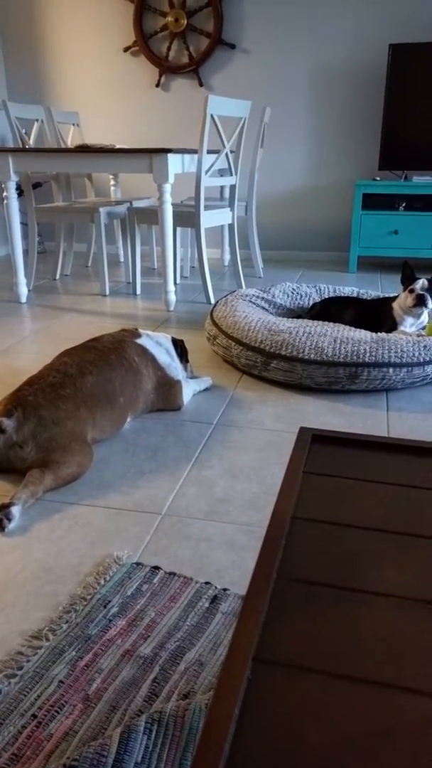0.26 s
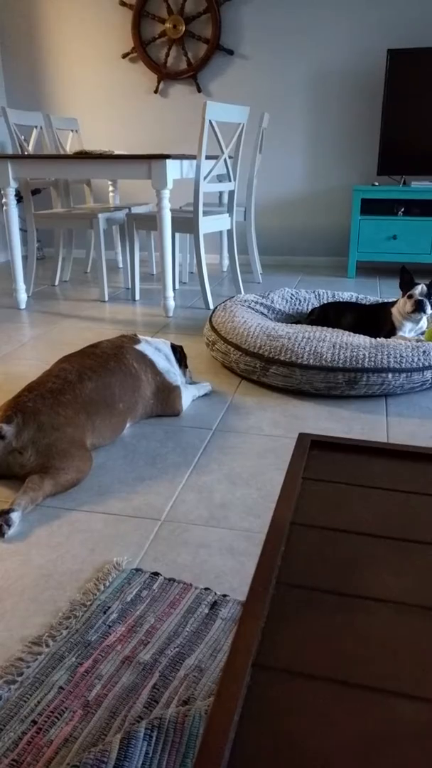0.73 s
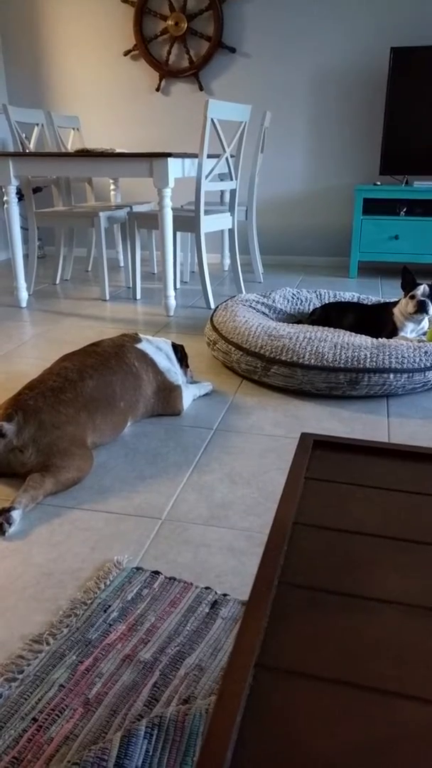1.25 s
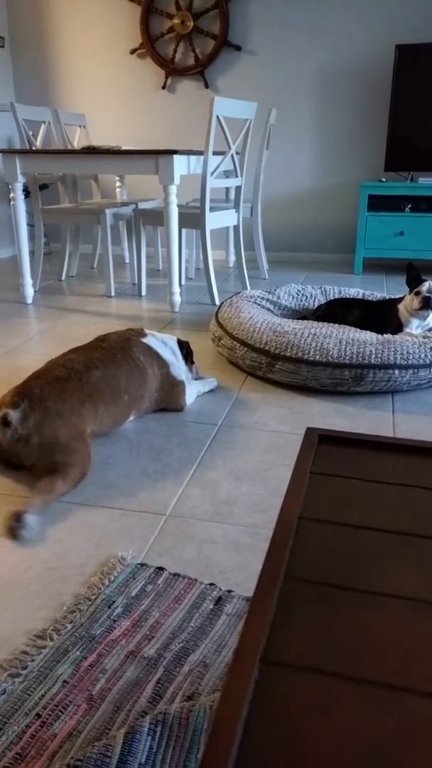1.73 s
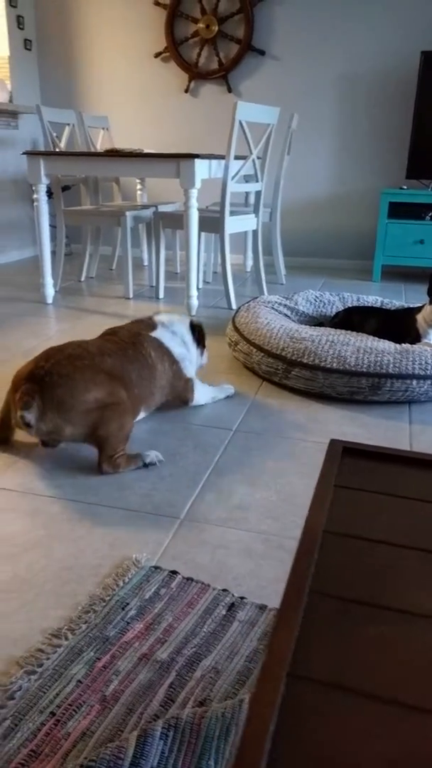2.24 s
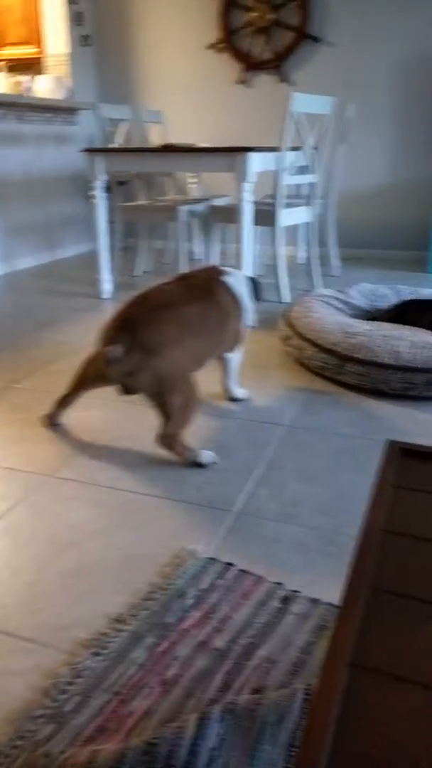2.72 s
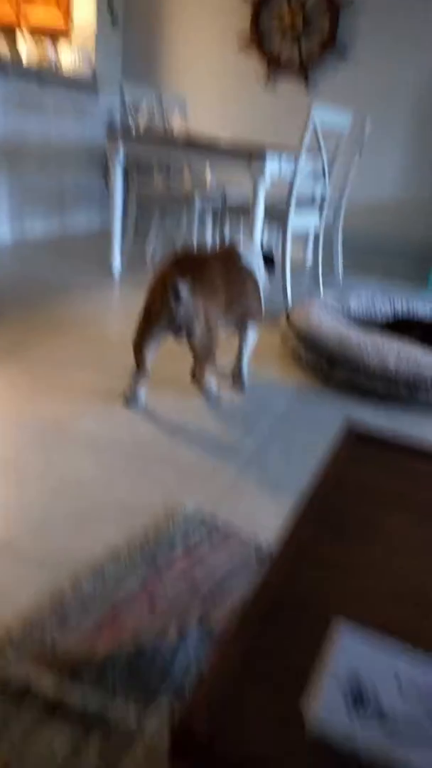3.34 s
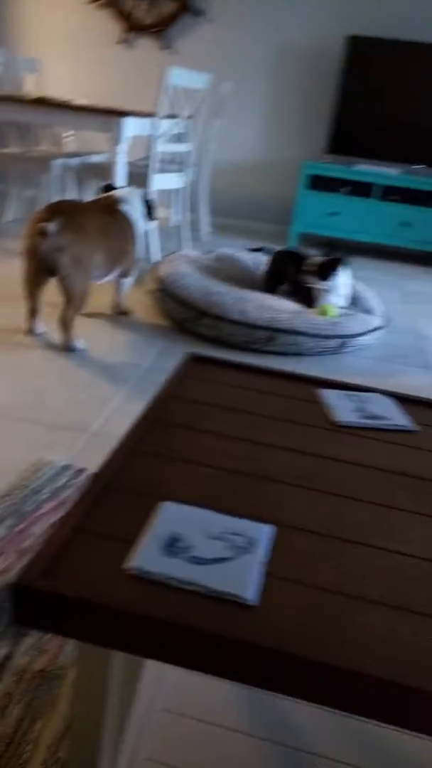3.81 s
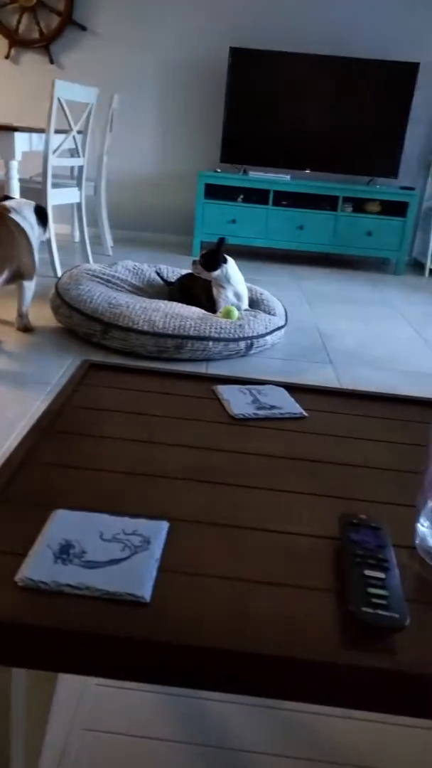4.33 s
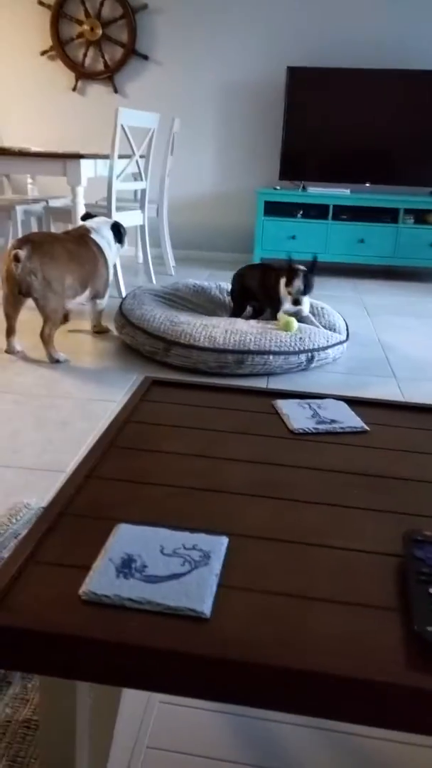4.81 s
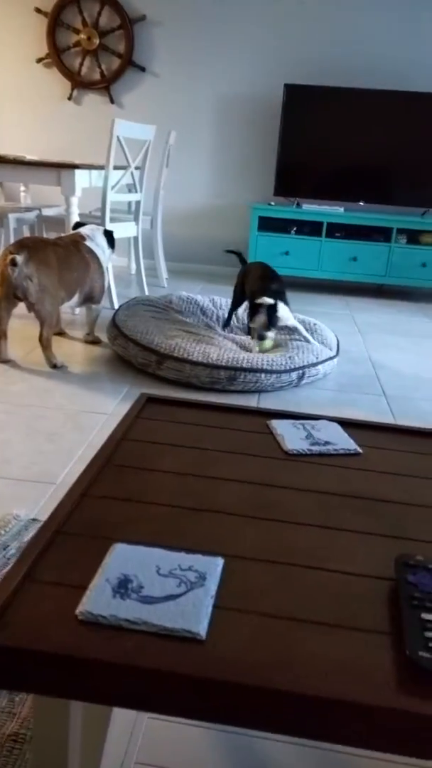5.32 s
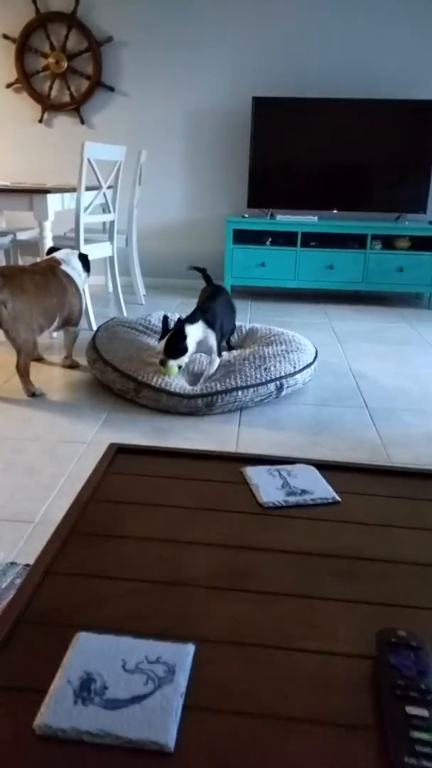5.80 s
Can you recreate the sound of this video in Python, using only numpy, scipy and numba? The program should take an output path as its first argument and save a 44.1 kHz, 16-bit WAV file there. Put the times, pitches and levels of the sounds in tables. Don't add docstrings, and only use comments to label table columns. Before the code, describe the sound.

A phone microphone in a quiet tiled living room hears low room tone, soft hiss and faint fridge hum. A small claw tick comes at 0.4 s. At 0.6-0.72 s a strap rasps very close: a loud, dry, zip-like buzz that speeds up and ends in two tiny snaps. Light claw and paw steps follow around 1.2 s. From about 1.5 to 2.4 s a bulldog a few metres away grumbles low and throaty, mouth closed, as fur or cloth rustles. Paws skid and claws tick at 2.5-3.1 s, with dull hand thumps on the phone near 2.8 s. At 3.55 s a loud, abrupt bark leaps up in pitch and turns hoarse, fading by 4 s into hard room echo. A rough growl rises from 4.25 s into a second tight, beating bark at 4.65-5.05 s. Reverberation, soft scuffs and faint whistling nose breaths close it.

```python
import sys
import numpy as np
from scipy import signal
from scipy.fft import rfft, irfft
from scipy.io import wavfile
from scipy.ndimage import uniform_filter1d, minimum_filter1d
from numba import njit

SR = 44100
rng = np.random.default_rng(int(sys.argv[2]) if len(sys.argv) > 2 else 0)


def elevation(decibels):
    levels = np.asarray(decibels, float)
    return 10 ** (levels / 20)


def persist_wave(psi):
    counts = np.round(np.clip(psi, -1, 1) * 32767).astype(np.int16)
    wavfile.write(sys.argv[1], SR, np.atleast_2d(counts).T)


N = 267113
TIME = np.arange(N) / SR


# time_s, effort_db, fold_rate_hz, throat_hz, opening_db
BARK_PATHS = [
    [(3.549, -26, 215.1, 404, -21), (3.578, -18, 230.3, 454, -9.5), (3.588, -13, 547.5, 536, -1.5),
     (3.61, -7.5, 567, 550, -3.5), (3.64, -7.5, 593, 544, -15.5), (3.67, -14.5, 570.5, 578, 2),
     (3.76, -17, 546.4, 566, -5), (3.88, -19.5, 519.6, 563, 1.5), (4.03, -40, 520.7, 588.7, -12)],
    [(4.62, -33, 207.9, 240, -27), (4.651, -29, 250, 284, -19), (4.658, -23, 370, 380, -14),
     (4.671, -21, 388.7, 470, -9), (4.681, -11, 557, 597, -1), (4.735, -11, 551.5, 580, -4.5),
     (4.91, -18.5, 524.8, 570, -0.5), (5.04, -28, 520.3, 557, -3), (5.09, -46.5, 523, 535, -1)],
]
LOCK_TIMES = [3.605, 4.68]
# centre_hz, width_hz, level_db
MOUTH_MODES = [
    [(694, 140, 0.5), (929, 112, 4), (1027, 100, 1), (1390, 227, -5.5), (1736, 200, -7), (2067, 250, -28.5)],
    [(743, 56, -9), (842, 80, 3.5), (954, 76, 1.5), (1111, 98, -6.5), (1387, 167, -3), (1924, 180, -9.5)],
]
# centre_hz, width_hz, level_db
SNOUT_MODES = [
    [(2696, 220, 8.5), (3004, 310, -6.5), (3900, 250, -14)],
    [(2680, 330, 4.5), (3117, 390, -4), (3710, 160, -8.5)],
]
MOUTH_LEVELS = [0.7, -0.13]
SNOUT_LEVELS = [-10.5, -12]
HISS_LEVELS = [-27.5, -26.5]
SNOUT_SHUT = [-12.5, -0.5]
BEAT_RATES = [33.3, 32.56]
BEAT_PEAKS = [3.677, 4.708]
BEAT_DEPTHS = [.35, .9]
RUSH_LAGS = [-.008, 0.027]
# centre_hz, width_hz, level_db
HISS_MODES = [(4983, 420, -17.5), (6470, 1027, 0), (8400, 1200, -10.5), (10300, 3500, -13),
              (14530, 4590, -20)]
# centre_hz, width_hz, level_db
RUSH_MODES = [(4920, 680, -2.5), (7680, 2500, 4), (11000, 2400, -4.5), (14600, 3200, -7)]
THROAT_WIDTH_HZ = 111
CHEST_OPEN_S = .06
ROUGH_BREAK, ROUGH_CLEAR, ROUGH_HOARSE, ROUGH_RISE_S = .4, .22, .52, .2
HISS_EFFORT_SHARE, HISS_OPEN_SHARE, SNOUT_SHARE = .79, .4, .8
SNOUT_CLEAR_S, RUSH_S = .063, .028


def bark(k):
    lock_s = LOCK_TIMES[k]
    gate, effort_db, hz, throat_hz, open_db = columns(BARK_PATHS[k], size=100)
    mouth_db = effort_db + MOUTH_LEVELS[k] + open_db
    shut_db = np.interp(TIME, [lock_s, lock_s + SNOUT_CLEAR_S], [SNOUT_SHUT[k], 0])
    snout_db = effort_db + SNOUT_LEVELS[k] + SNOUT_SHARE * open_db + shut_db
    hiss_db = HISS_LEVELS[k] + HISS_EFFORT_SHARE * effort_db + HISS_OPEN_SHARE * open_db

    rough_times = [lock_s - .015, lock_s, lock_s + ROUGH_RISE_S]
    rough = np.interp(TIME, rough_times, [ROUGH_BREAK, ROUGH_CLEAR, ROUGH_HOARSE])
    voice, air_puffs = folds(hz, rough)

    throat = voice
    for width_hz in (2.5 * THROAT_WIDTH_HZ, 2.0 * THROAT_WIDTH_HZ, 490.0):
        throat = svf(throat, throat_hz, width_hz)
    beating = (TIME > lock_s - .02) * np.cos(2 * np.pi * BEAT_RATES[k] * (TIME - BEAT_PEAKS[k]))
    throat = (1 + BEAT_DEPTHS[k] * beating) * steady(throat)

    closed = uniform_filter1d(1. * (TIME < BARK_PATHS[k][0][0] + CHEST_OPEN_S), size=400)
    chest = steady(ring(voice, [(204.7, 110, -1.5), (350.6, 268, -7)])) * (elevation(-9.5) * closed + elevation(-27.5))

    jet = .5 * air_puffs + rng.standard_normal(N)
    burst = np.exp(-((TIME - lock_s - RUSH_LAGS[k]) / RUSH_S) ** 2)
    hiss = steady(ring(jet, HISS_MODES)) + elevation(4.5) * burst * steady(ring(jet, RUSH_MODES))

    upper = elevation(mouth_db) * steady(ring(voice, MOUTH_MODES[k]))
    upper += elevation(snout_db) * steady(ring(voice + 1.1 * air_puffs, SNOUT_MODES[k]))
    return gate * (elevation(effort_db) * (throat + chest) - upper + elevation(hiss_db) * hiss)


# time_s, fold_rate_hz, effort_db, lift_db (a lifted larynx takes sound from the chest)
GRUMBLE_PATH = [
    (1.38, 124, -85, -12),
    (1.43, 118, -64.5, -4),
    (1.66, 110, -58.5, -3.5),
    (1.75, 107.8, -51.5, -3),
    (1.87, 104.3, -42, -1),
    (1.99, 115.2, -43, -3),
    (2.1, 110, -41.5, 11),
    (2.25, 108.3, -48.5, 21),
    (2.44, 102.1, -75, 7),
]
# time_s, fold_rate_hz, effort_db, lift_db
GROWL_PATH = [
    (4.245, 115.1, -52, -7.5),
    (4.299, 116.9, -43, 0.1),
    (4.42, 125.8, -45.5, -2.5),
    (4.5, 131.1, -40.5, 2.5),
    (4.589, 139.8, -40.5, 4),
    (4.65, 135, -33.5, 17.5),
]
CLOSED_ROUGH = [.6, .38]
# centre_hz, width_hz, level_db
CHEST_MODES = [
    [(110, 50, 1)],
    [(125, 107, 0)],
]
PHARYNX_MODES = [
    [(162, 57, 3), (211, 96, -0.5), (326, 143, -9)],
    [(182, 72, 3), (260.5, 120, -2.5), (370, 99, -7)],
]
NOSE_MODES = [
    [(564, 76, 4), (987, 205, -9), (1200, 35.3, -35)],
    [(566, 30, -3), (998, 160, -2)],
]
BREATH_MODES = [
    [(3093, 970, 10), (4660, 340, -22)],
    [(3080, 830, -10), (5667, 403, -4.5), (6500, 710, -2)],
]
NOSE_LEVELS = [-12, -16]
BREATH_LEVELS = [-22, -21]
FULL_EFFORT_DB = -42
NOSE_SHARE, BREATH_SHARE = 1.14, .76
THROB_HZ, THROB_WIDTH_HZ, THROB_DB = 21, 12, 2.5


def grumble(k):
    gate, hz, effort_db, lift_db = columns((GRUMBLE_PATH, GROWL_PATH)[k], size=900)
    throb = unit(ring(rng.standard_normal(N), [(THROB_HZ, THROB_WIDTH_HZ, 0)]))
    effort_db = effort_db + THROB_DB * throb
    short_db = effort_db - FULL_EFFORT_DB
    nose_db = FULL_EFFORT_DB + NOSE_LEVELS[k] + NOSE_SHARE * short_db
    breath_db = FULL_EFFORT_DB + BREATH_LEVELS[k] + BREATH_SHARE * short_db

    voice, air_puffs = folds(hz, np.full(N, CLOSED_ROUGH[k]))
    out = elevation(effort_db - lift_db) * steady(ring(voice, CHEST_MODES[k]), size=3000)
    out += elevation(effort_db) * steady(ring(voice, PHARYNX_MODES[k]), size=3000)
    out += elevation(nose_db) * steady(ring(voice, NOSE_MODES[k]), size=3000)
    out += elevation(breath_db) * steady(ring(air_puffs, BREATH_MODES[k]), size=3000)
    return gate * out


def folds(hz, rough):
    chance = rng.standard_normal((5000, 2)).clip(-1.7, 1.7)
    pulses, phase, size = beats(hz, rough, chance, .18, .88)
    air_puffs = size * np.exp(-phase / .5) * rng.standard_normal(N)
    return pulses * np.sqrt(SR / hz) + 1.9 * rough * air_puffs, air_puffs


@njit
def beats(hz, rough, chance, stretch, scatter):
    pulses, phase, size = np.zeros(len(hz) + 1), np.empty(len(hz)), np.empty(len(hz))
    p, cycle = .999, 0
    for i in range(len(hz)):
        step = hz[i] * np.exp(stretch * rough[i] * chance[cycle, 0]) / SR
        p += step
        now = np.exp(scatter * rough[i] * chance[cycle, 1])
        if p >= 1:
            p, cycle = p - 1, cycle + 1
            pulses[i] += now * p / step
            pulses[i + 1] += now * (1 - p / step)
        phase[i], size[i] = p, now
    return pulses[:-1], phase, size


# peak_s, peak_db, rise_s (10 dB), fade_s (10 dB)
PUFFS = [
    (5.27, -66.5, 0.4, .3),
    (5.63, -67, 0.24, 0.15),
]


def pant():
    whistle = unit(ring(rng.standard_normal(N), [(3104, 510, 0)]))
    return sum(swell(*puff) for puff in PUFFS) * whistle


# time_s, rib_rate_hz, level_db
RIB_PATH = [
    (.596, 370, -9.5),
    (.605, 295.1, -1),
    (.63, 287.4, -12),
    (.668, 293.3, -10),
    (.68, 315.3, -13),
    (.7105, 399.6, -15),
]
# time_s, level_db
SINGLE_RIBS = [
    (0.7133, -12),
    (0.7171, -7.5),
]
# frequency_hz, level_db per Hz
STRAP_COLOUR = [(88, -65.5), (150, -40.5), (288, -4), (403, -18), (621, -9), (819, -16), (979, -6),
                (2030, -8), (3020, -1), (4480, -6), (5040, -11.5), (9110, -11), (12500, -6), (15800, -15),
                (16800, -57.5)]
SLIP_SHARE, SLIP_SHRINK_PER_S = .72, 1.8


def strap():
    gate, hz, db = columns(RIB_PATH, size=8)
    level = gate * elevation(db)
    start_s = RIB_PATH[0][0]
    slip = np.clip(SLIP_SHARE - SLIP_SHRINK_PER_S * (TIME - start_s), .1, 1)
    clicks, phase, size = beats(hz * gate.clip(1e-9), gate, rng.standard_normal((200, 2)), .03, .2)
    scrape = level * size * np.sin(np.pi * np.clip(phase / slip, 0, 1))
    for s, rib_db in SINGLE_RIBS:
        scrape += elevation(rib_db) * np.exp(-((TIME - s) / .00012) ** 2)
    slips = (scrape + .12 * level) * rng.standard_normal(N) - 3.7 * level * clicks
    out = colour(slips, STRAP_COLOUR) * (TIME > start_s)
    return out * np.sqrt(np.sum(slips ** 2) / np.sum(out ** 2)) * elevation(3.0)


# peak_s, peak_db, fade_s (10 dB), treble_db
PAW_STEPS = [
    (1.222, -62, 0.04, 8.5),
    (2.514, -57.5, 0.15, -10),
    (2.802, -55.5, 0.22, -2),
    (2.99, -57, 0.05, 2),
    (3.085, -51.5, 0.11, 6.5),
    (4.537, -54, 0, -10),
]
# peak_s, peak_db, swell_s (10 dB), treble_db
CLOTH_DRAGS = [(.17, -68, 0.32, 1), (1.82, -58, 0.03, 3.5), (1.97, -55.5, 0.02, -1),
               (2.21, -50.5, 0.1, -0.2), (2.39, -58.5, 0.06, -13), (2.67, -63.5, 0.15, 2),
               (3.34, -55, 0.14, -4), (3.57, -54.5, 0.07, 3.5), (3.98, -62, 0.16, 0),
               (4.2, -60.5, .12, -0.5), (4.665, -58.5, 0.1, -2), (5.07, -57, 0.2, -8), (5.49, -67, 0.2, -2),
               (5.85, -66, 0.1, -4.5), (6.04, -68, .05, 0.5)]
# peak_s, peak_db, rise_s (10 dB), fade_s (10 dB)
BODY_TURNS = [
    (3.25, -59, 0.02, 0.17),
    (3.43, -60, 0.01, 1.6),
]
STEP_RISE_S, SHORTEST_DRAG_S = .006, .032


def scuffs():
    mid = unit(colour(rng.standard_normal(N), [(1500, -11), (3200, -6.5), (7500, -4.0), (9500, -12.5)]))
    treble = unit(colour(rng.standard_normal(N), [(6500, -32), (9000, -.5), (12000, -2), (15500, -6.5)]))
    dull = unit(ring(rng.standard_normal(N), [(604, 210, -1), (1660, 350, -10.5)]))
    out = np.zeros(N)
    for s, db, fade_s, treble_db in PAW_STEPS:
        out += swell(s, db, STEP_RISE_S, max(fade_s, SHORTEST_DRAG_S)) * (mid + elevation(treble_db) * treble)
    for s, db, swell_s, treble_db in CLOTH_DRAGS:
        swell_s = max(swell_s, SHORTEST_DRAG_S)
        out += swell(s, db, swell_s, swell_s) * (mid + elevation(treble_db) * treble)
    return out + sum(swell(*turn) for turn in BODY_TURNS) * dull


# start_s, peak_db, pitch_hz, t60_s
CLAW_TICKS = [
    (0.4195, -38.5, 3720, 0.016),
    (1.1544, -54, 3480, 0.025),
    (1.2552, -40, 3230, 0.023),
    (2.5036, -47, 3360, 0.032),
    (2.796, -51, 3820, 0.02),
    (4.537, -41, 3900, 0.05),
]
CLAW_WIDTHS = [704, 695, 700, 2500, 2500, 2230]
# start_s, peak_db, pitch_hz
HAND_THUMPS = [
    (2.788, -45.5, 32),
    (2.862, -39.5, 32.3),
    (2.887, -38.5, 33.5),
]


def knocks():
    out = np.zeros(N)
    for (s, db, hz, t60), width_hz in zip(CLAW_TICKS, CLAW_WIDTHS):
        t = np.clip(TIME - s, 0, None)
        snap = unit(ring(rng.standard_normal(N), [(hz, width_hz, 0)]))
        decay = np.exp(-np.log(1000) * t / t60) * np.minimum(t / .001, 1)
        out += elevation(db) * decay * (.4 * np.sin(2 * np.pi * hz * t) + .6 * snap)
    for s, db, hz in HAND_THUMPS:
        t = np.clip(TIME - s, 0, None)
        out += elevation(db) * np.exp(-t / .02) * np.sin(2 * np.pi * hz * t) * 2.0
    return out


# frequency_hz, level_db per Hz
AIR_COLOUR = [(12, -31.5), (20, 2.5), (82, -3.5), (175, -18), (226, -18.5), (483, -25.5), (824, -28),
              (1000, -28), (1450, -30.5), (2850, -32.5), (3570, -32), (4470, -35), (15000, -32.5),
              (16800, -52.5)]
# pitch_hz, level_db
FRIDGE_LINES = [(59.2, -64.5), (242.2, -72.5), (479.1, -83.5)]


def air():
    hum = sum(elevation(db) * unit(ring(rng.standard_normal(N), [(hz, 9.0, 0)])) for hz, db in FRIDGE_LINES)
    return elevation(-56.5) * unit(colour(rng.standard_normal(N), AIR_COLOUR)) + hum


# centre_hz, t60_s, level_db
ROOM_BANDS = [(118, 0.77, -5.5), (306, 0.54, -5), (505, 0.6, -2), (960, 0.68, -1.5), (1998, 0.63, -3),
              (3180, 0.51, -1), (4880, 0.5, 2), (6000, 0.47, -4), (8000, 0.42, -8), (10500, 0.37, -7.5),
              (15000, 0.26, -1.5)]


def room():
    t, out = TIME[:SR], 0
    noise = rfft(rng.standard_normal(SR))
    axis = np.log(np.arange(len(noise)) + 1)
    centres = np.log(np.transpose(ROOM_BANDS)[0])
    for share, (_, t60, db) in zip(np.eye(len(centres)), ROOM_BANDS):
        band = irfft(noise * np.interp(axis, centres, share), SR)
        out = out + band * elevation(db - 60 * t / t60)
    out = out * np.clip((t - .004) / .002, 0, 1)
    return out / np.sqrt(np.sum(out ** 2))


def ring(x, modes):
    out = np.zeros(N)
    for k, (hz, width_hz, db) in enumerate(modes):
        centre = np.full(N, 1. * hz)
        once = svf(x, centre, 1.5 * width_hz)
        out += (-1) ** k * elevation(db) * svf(once, centre, 1.5 * width_hz)
    return out


@njit
def svf(x, hz, width):
    y, band, low = np.empty(len(x)), 0., 0.
    for i in range(len(x)):
        g, k = np.tan(np.pi * hz[i] / SR), width / hz[i]
        v = (band + g * (x[i] - low)) / (1 + g * (g + k))
        band, low, y[i] = 2 * v - band, low + 2 * g * v, k * v
    return y


def colour(x, points):
    hz, db = np.transpose(points)
    axis = np.log(np.arange(len(x) // 2 + 1) * SR / len(x) + 1)
    return irfft(rfft(x) * elevation(np.interp(axis, np.log(hz), db)), len(x))


def columns(table, size):
    s, *rest = np.transpose(table)
    gate = uniform_filter1d(1. * ((TIME > s[0]) & (TIME < s[-1])), size=size)
    return [gate] + [np.interp(TIME, s, c) for c in rest]


def swell(s, db, rise_s, fade_s):
    return elevation(db - 10 * np.maximum((s - TIME) / rise_s, (TIME - s) / fade_s))


def steady(x, size=1500):
    return x / np.sqrt(uniform_filter1d(x ** 2, size=size) + 1e-30)


def unit(x):
    return x / np.sqrt(np.mean(x ** 2) + 1e-30)


def scene():
    dog = sum(bark(k) + grumble(k) for k in range(2))
    near = strap()
    wet = signal.fftconvolve(elevation(-4) * dog + elevation(-12.5) * near, room())[:N]
    return (elevation(-2.5) * dog + near + wet + pant() + scuffs() + knocks() + air())[None]


def roll_off(x):
    return signal.sosfilt(signal.butter(12, 17090, fs=SR, output="sos"), x)


GAIN_KNEE_DB, GAIN_SLOPE, GAIN_MEMORY_S = -31, .17, .09
PEAK, TOP_HZ = .71, 15800


def record(dry):
    keep = np.exp(-1 / (GAIN_MEMORY_S * SR))
    loud = np.sqrt(signal.lfilter([1 - keep], [1, -keep], dry ** 2) + 1e-12)
    x = dry * np.minimum(1, elevation(GAIN_KNEE_DB) / loud) ** GAIN_SLOPE
    x = signal.sosfilt(signal.ellip(8, .2, 70, TOP_HZ, fs=SR, output="sos"), x)
    limit = np.minimum(1, PEAK / (np.abs(x) + 1e-9))
    x = x * uniform_filter1d(minimum_filter1d(limit, size=129), size=65)
    return roll_off(x)


dry = scene()
out = record(dry)
persist_wave(out)
```